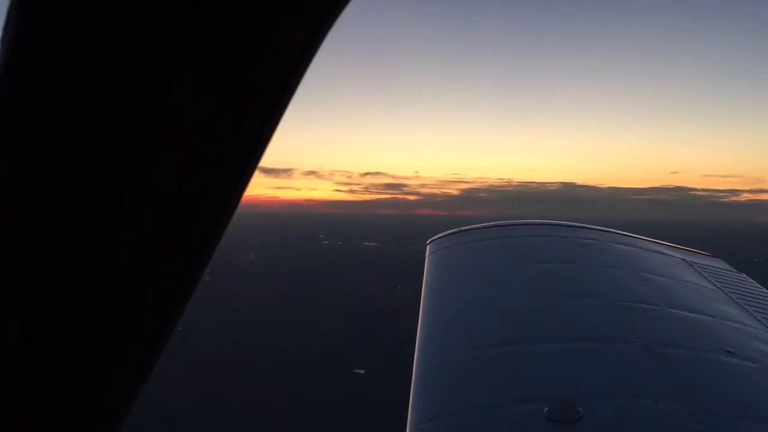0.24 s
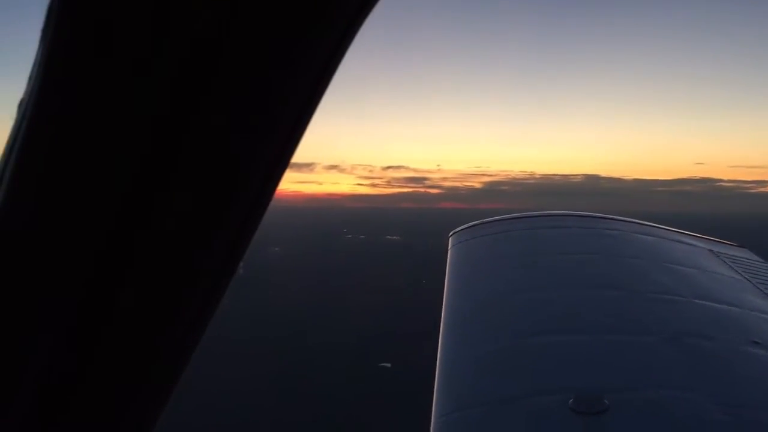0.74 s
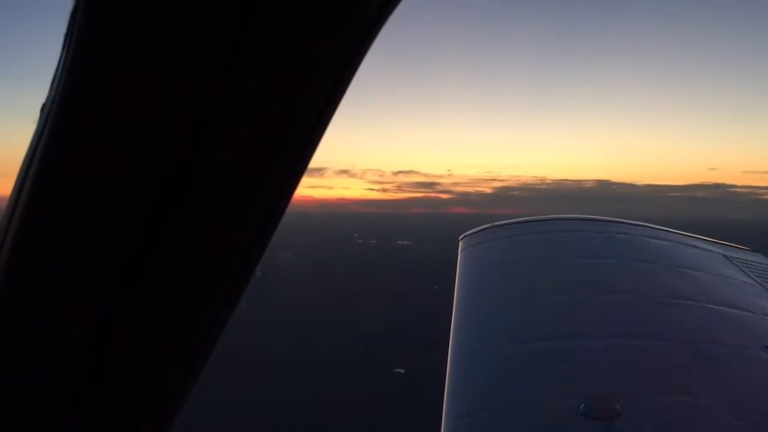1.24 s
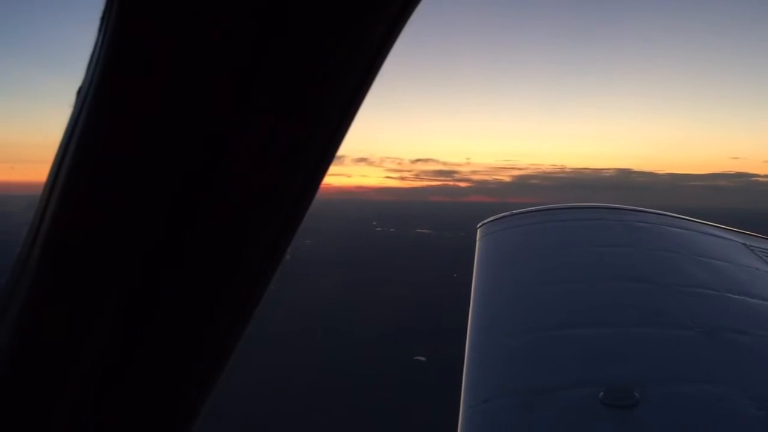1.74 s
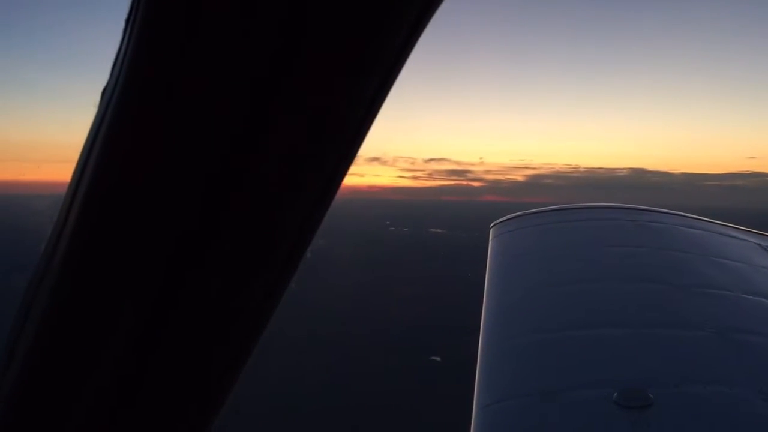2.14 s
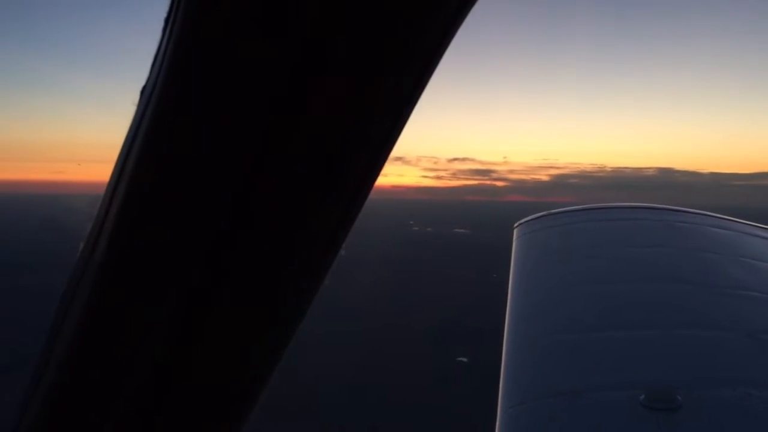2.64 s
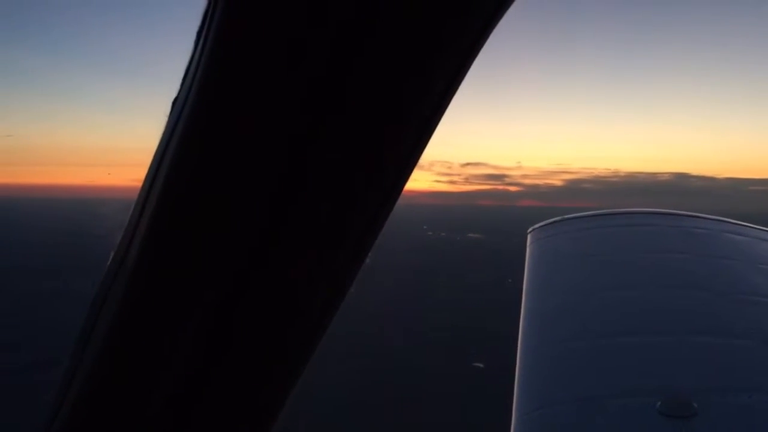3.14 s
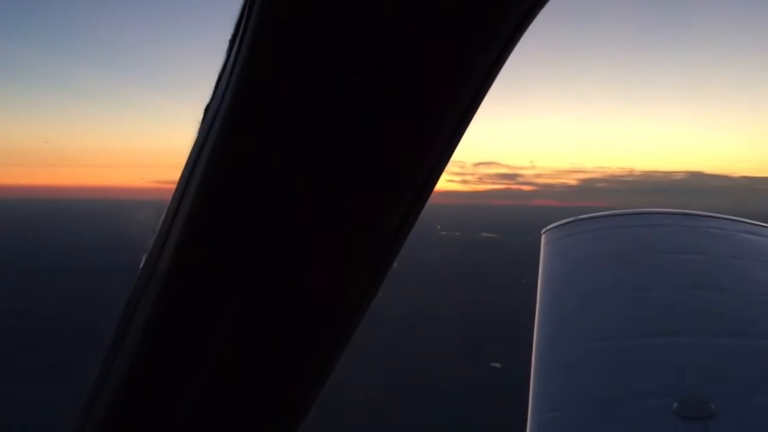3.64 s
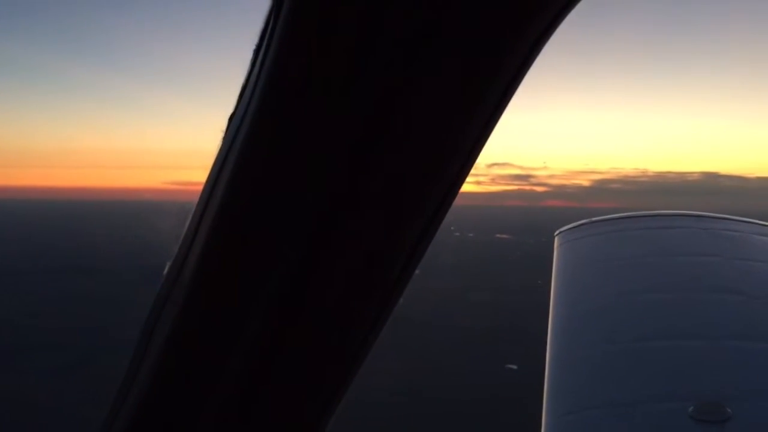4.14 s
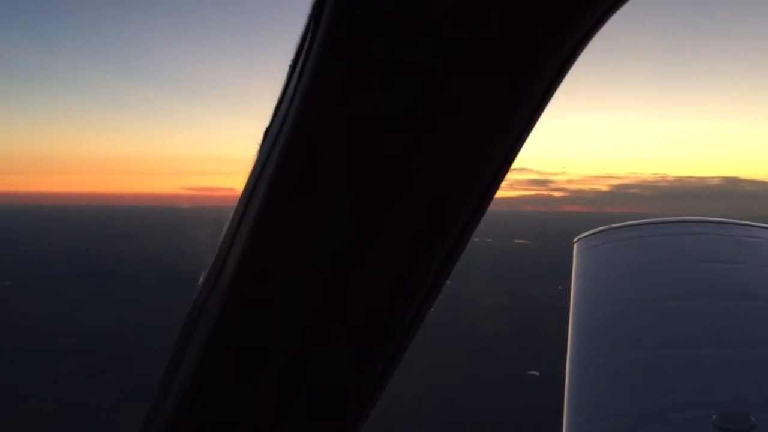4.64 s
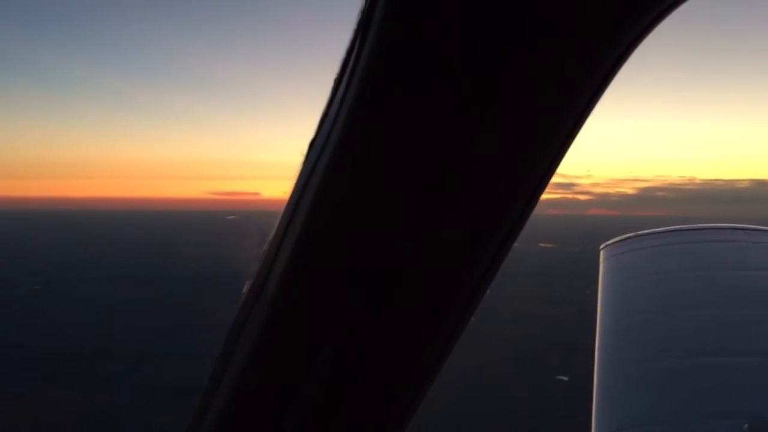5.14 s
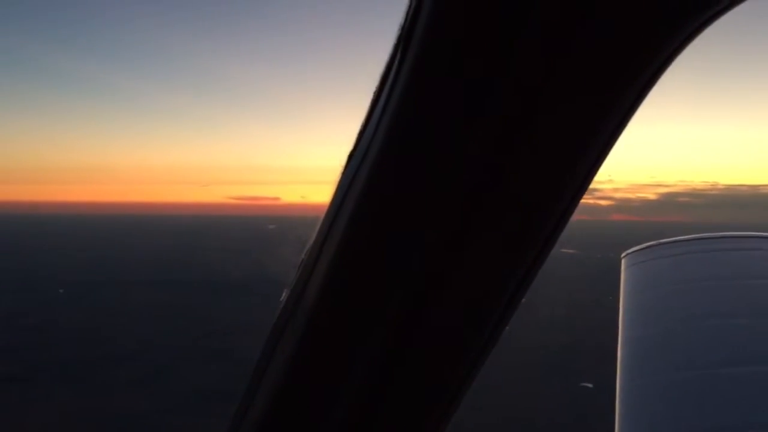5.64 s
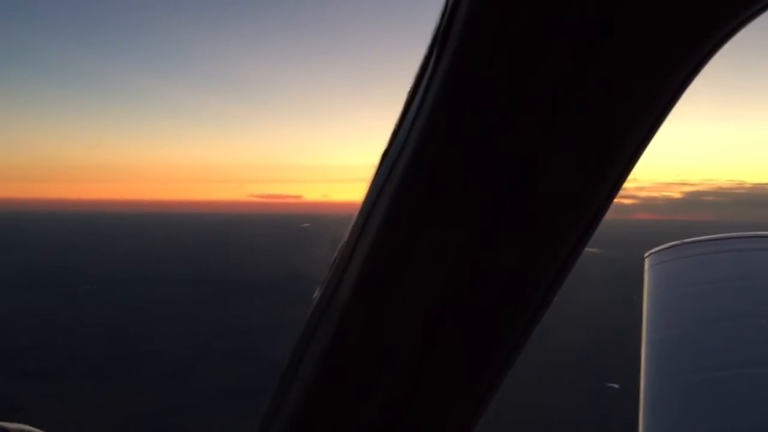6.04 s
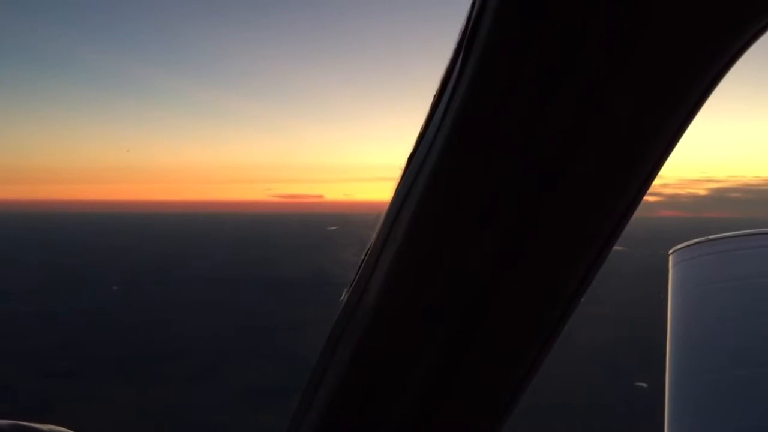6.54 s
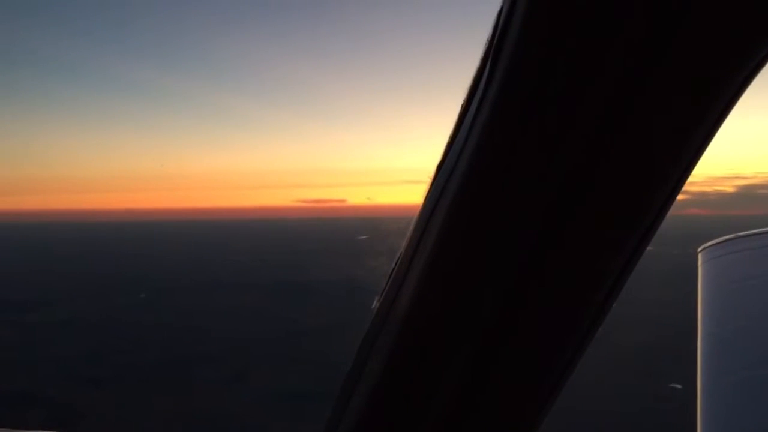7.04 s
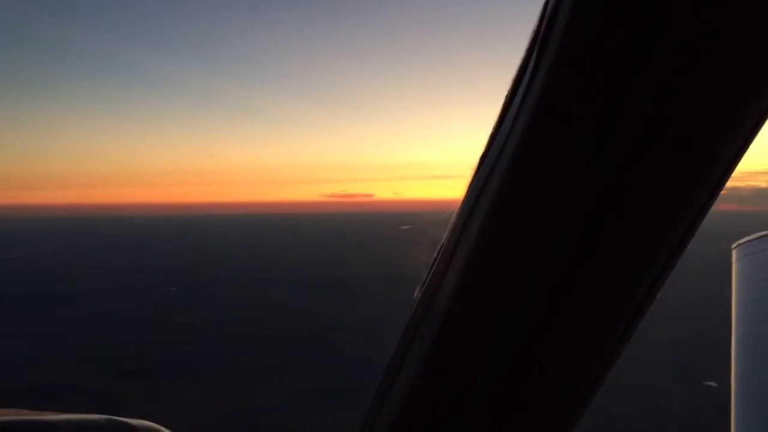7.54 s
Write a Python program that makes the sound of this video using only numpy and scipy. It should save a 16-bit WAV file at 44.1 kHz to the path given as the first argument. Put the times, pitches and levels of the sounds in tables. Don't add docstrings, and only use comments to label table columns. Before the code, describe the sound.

A steady low propeller-plane drone fills the cabin, with a slightly wavering hollow note, broad air roar and faint puffs of draught.

```python
import sys
import numpy as np
from scipy import signal
from scipy.fft import rfft, irfft, next_fast_len
from scipy.io import wavfile

SR = 44100
rng = np.random.default_rng(int(sys.argv[2]) if len(sys.argv) > 2 else 0)


def linear_from_db(decibels):
    return 10 ** (np.asarray(decibels, float) / 20)


def store_wav(level_fs):
    pcm = np.round(np.clip(np.atleast_2d(level_fs), -1, 1) * 32767)
    wavfile.write(sys.argv[1], SR, pcm.T.astype(np.int16))


N = 343980


def in_time(rows):
    s, *columns = np.transpose(rows)
    return [np.interp(np.arange(N) / SR, s, column) for column in columns]


def bells(rows):
    t = np.arange(N) / SR
    return sum(height * np.exp(-.5 * ((t - s) / half_s) ** 2) for s, height, half_s in rows)


def swells_db(rows, half_s):
    return bells([(s, db, half_s) for s, db in rows])


def turns(hz):
    return 2 * np.pi * np.cumsum(hz) / SR


def drift(rate_hz):
    r = np.exp(-80 * np.pi * rate_hz / SR)
    noise = rng.standard_normal(N // 40 + 2002)
    slow = signal.lfilter([1], [1, -2 * r, r * r], noise)[2000:]
    return np.interp(np.arange(N) / 40, np.arange(len(slow)), slow / slow.std())


# middle_s [s], level_db [dB], half_length_s [s]
DRAUGHT_PUFFS = [(1.728, -32, 0.017), (1.8, -43, 0.08), (2.037, -31, 0.016), (2.304, -36.5, 0.022),
                 (2.62, -43, 0.038), (2.855, -35, 0.032), (2.75, -46, 0.13), (3.126, -33, .03),
                 (3.235, -35, 0.021), (4.855, -30, 0.011), (4.955, -33, 0.021), (5.04, -40, 0.028),
                 (5.153, -34.5, 0.15), (5.33, -37, 0.046), (6.947, -33, .025)]


def draught(low_hz, high_hz, lumpy_db):
    envelope = bells([(s, linear_from_db(db), half_s) for s, db, half_s in DRAUGHT_PUFFS])
    band = signal.butter(1, [low_hz, high_hz], "band", fs=SR, output="sos")
    dull = signal.butter(2, 1.95 * high_hz, fs=SR, output="sos")
    noise = signal.sosfilt(band, rng.standard_normal(N))
    noise = signal.sosfilt(dull, noise)
    return envelope * linear_from_db(lumpy_db * drift(31)) * noise / noise.std()


def cabin_noise(size, hz, ripple_db, width_hz, count):
    place, out = np.linspace(0, count - 1, size), 0
    grid_hz = np.arange(0, SR / 2 + width_hz, width_hz)
    strength = np.clip(hz / 900 - .5, 0, 1) * np.clip(2500 / hz, .3, 1)
    for k in range(count):
        ripple = np.interp(hz, grid_hz, rng.standard_normal(len(grid_hz))) * strength
        fade = np.cos(np.pi / 2 * np.clip(place - k, -1, 1))
        out = out + fade * irfft(rfft(rng.standard_normal(size)) * linear_from_db(ripple_db * ripple), size)
    return rfft(out)


# pitch_hz [Hz], level_db [dB per Hz]
RUMBLE_COLOUR = [(20, -26), (30, -23), (45, -8), (58, -2), (90, -0.3), (125, 1), (150, -1), (200, -5.5),
                 (250, -9.0), (300, -12.5), (340, -19.5), (450, -20.2)]
# pitch_hz [Hz], level_db [dB per Hz]
ROAR_COLOUR = [(340, -3.1), (460, -4), (540, 1.4), (700, -2.5), (800, -6.5), (1000, -7.5), (1250, -4),
               (1750, -6.5), (1950, -10.5), (2350, -9.5), (2580, -6.5), (2800, -11), (3000, -16),
               (3600, -17.7)]
# pitch_hz [Hz], level_db [dB per Hz]
HISS_COLOUR = [(3000, -.2), (4000, -2), (4600, -3.5), (4900, -6), (5400, -3), (6800, -7), (7400, -7.5),
               (8200, -11), (9800, -12.5), (10450, -17), (11000, -14), (13500, -14.5), (14500, -13),
               (15250, -15)]
# time_s [s], change_db [dB]
AIR_GUSTS = [(0, -1), (.5, -3.5), (1.4, -2.5), (1.8, 4.5), (2.2, -2.5), (2.8, 1), (3.6, -3.5), (3.9, 1.5),
             (4.4, 0.5), (5.1, 0), (5.8, -3.5), (6.6, -3), (7.1, 2.5), (7.8, -0.5)]
# middle_s [s], change_db [dB]
AIR_BUMPS = [(.5, -4), (1.2, -3), (3.05, -5), (3.6, 4), (3.95, -5), (4.35, 6), (4.75, 5), (5.15, -17),
             (5.9, 2), (6.65, 2), (6.95, -3)]


def slipstream(cycle, patchy_db, chop, chop_twice):
    size = next_fast_len(N)
    hz = np.maximum(np.arange(size // 2 + 1) * SR / size, 1)
    ranges = [(RUMBLE_COLOUR[:-1], -43), (ROAR_COLOUR[1:-1], -59), (HISS_COLOUR[1:], -75)]
    knots = np.array([(f, db + range_db) for rows, range_db in ranges for f, db in rows])
    colour = linear_from_db(np.interp(np.log(hz), np.log(knots[:, 0]), knots[:, 1])) * np.sqrt(SR / 2)
    spectrum = cabin_noise(size, hz, ripple_db=1.7, width_hz=60, count=7) * colour

    gust, = in_time(AIR_GUSTS)
    buffet = 0.6 + swells_db(AIR_BUMPS, half_s=.12)
    turn = np.linspace(-1, 1, N)
    roar = -1.2 * turn + 0.065 * gust
    window = -1.5 * turn - .5
    blades = 1 + chop * np.cos(4 * cycle) + chop_twice * np.cos(8 * cycle)
    swells = [  # (centre_hz, change_db)
        (55, 0.97 * buffet),
        (100, .3 * buffet - 0.14 * gust),
        (220, 0.22 * gust + 1.1 - 2.9 * turn ** 2),
        (400, 0.89 * gust),
        (650, 0.44 * gust + .6 * turn),
        (1300, 0.94 * roar),
        (2550, 0.67 * window),
        (4000, 0.093 * window),
        (5800, -.3 * window),
        (8000, 0.11 * roar),
        (12000, .15 * window)]
    centres = np.log([centre_hz for centre_hz, db in swells])
    out = np.zeros(N)
    for k, (centre_hz, swell_db) in enumerate(swells):
        share = np.interp(np.log(hz), centres, np.arange(len(swells)) == k)
        patches_db = patchy_db * drift(12.0) * min(1, 2500 / centre_hz)
        band = irfft(spectrum * share, size)[:N] * linear_from_db(swell_db + patches_db)
        if k == len(swells) - 1:
            band = band * blades
        out += band
    return out


# middle_s [s], change_db [dB]
HOWL_SURGES = [(.15, 2.5), (.7, -1.5), (1.0, 1.5), (1.32, -3), (1.5, 2), (1.68, -2.5), (2.05, 3.5),
               (2.35, -1.5), (2.95, 2), (4.2, -4), (4.8, 1), (5.05, -6.5), (5.45, 2.5), (5.87, -4.5),
               (6.55, 2.5), (6.8, -1.5), (7.3, 0.3)]
# time_s [s], pitch_hz [Hz]
HOWL_NOTE = [(0, 135.15), (.9, 134.75), (1.35, 135.9), (1.9, 135.2), (2.3, 134.6), (3.0, 135.1),
             (4.0, 135.25), (5.6, 135.15), (6.9, 135.8), (7.4, 135.0), (7.8, 134.9)]


def cavity(gain_db, flutter_db, jitter, octave_db):
    level_db = -22 + swells_db(HOWL_SURGES, half_s=0.061)
    phase = turns(in_time(HOWL_NOTE)[0]) + jitter * drift(6.3)
    note = np.sin(phase) + linear_from_db(octave_db) * np.sin(2 * phase)
    return np.sqrt(2) * linear_from_db(level_db + gain_db + flutter_db * drift(5.3)) * note


# order [multiple of the cycle rate], level_db [dB rms]
ENGINE_ORDERS = [(4, -31.2), (5, -31.4), (6, -35.0), (8, -27.8), (9, -37.3), (11, -40.3), (12, -33.9),
                 (13, -43.2), (14, -43.3), (16, -47.0), (20, -48.5), (21, -54.7), (26, -45.2), (27, -46.4),
                 (28, -44.1), (30, -48.0), (31, -55.1), (32, -49.3), (33, -48.7), (35, -46.4), (36, -51.1),
                 (37, -56.3), (38, -57.3), (40, -52.2), (41, -56.2), (43, -57.4), (44, -59.0), (48, -57.7),
                 (54, -61.1), (56, -58.2)]


def engine(cycle, gain_db, waver_db, faint_db, turning_db):
    clear, hum = dict(ENGINE_ORDERS), np.zeros(N)
    progress = np.linspace(-1, 1, N)
    leaning = {12: -.4, 16: -1.3, 20: .5, 26: .3, 28: 1.2}
    for order in range(2, 73):
        start, uneven = rng.random(), rng.standard_normal()
        spread = .18 if order > 22 and order % 2 == 0 else 1
        tone = np.sin(order * cycle + 2 * np.pi * start * spread)
        if order in clear:
            swell_db = waver_db * drift(0.38) + turning_db * leaning.get(order, 0) * progress
            hum += linear_from_db(clear[order] + gain_db + swell_db) * tone
        elif order != 7:
            slope_db = -6.1 * np.log2(max(order, 5) / 40)
            hum += linear_from_db(faint_db + slope_db + 2 * uneven) * tone
    return np.sqrt(2) * hum


# time_s [s], rate_hz [cycles per s]
ENGINE_CYCLE = [
    (0.0, 19.78),
    (0.6, 19.83),
    (2.4, 19.865),
    (3.0, 19.83),
    (4.2, 19.826),
    (6.4, 19.847),
    (7.8, 19.81),
]


def scene():
    cycle = turns(in_time(ENGINE_CYCLE)[0])
    puffs = draught(low_hz=278, high_hz=740, lumpy_db=3.5)
    air = slipstream(cycle, patchy_db=.4, chop=.145, chop_twice=.11)
    note = cavity(gain_db=2.5, flutter_db=.7, jitter=0.15, octave_db=-24)
    hum = engine(cycle, gain_db=0.87, waver_db=0.9, faint_db=-64.5, turning_db=4)
    return (hum + note + air + puffs)[None]


def roll_off(x):
    return signal.sosfilt(signal.butter(12, 15290, fs=SR, output="sos"), x)


def record(dry):
    mix = 0.79 * np.tanh(dry / 0.79)
    return roll_off(mix)


dry = scene()
out = record(dry)
store_wav(out)
```